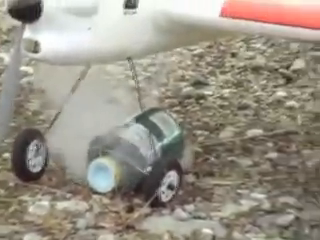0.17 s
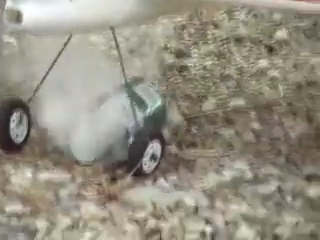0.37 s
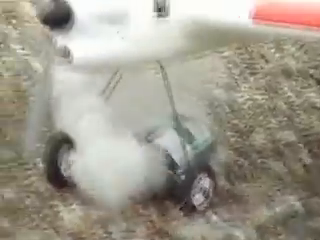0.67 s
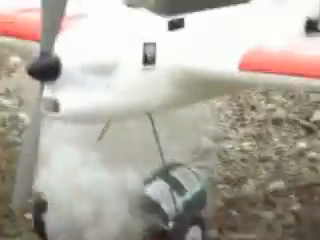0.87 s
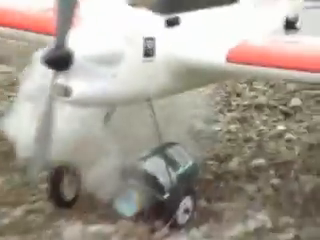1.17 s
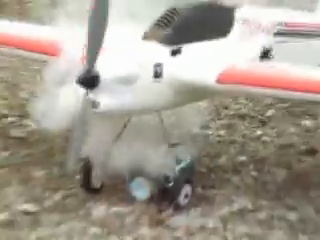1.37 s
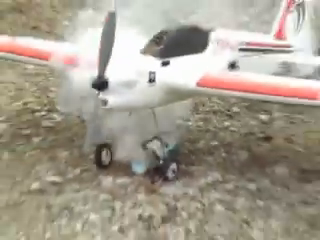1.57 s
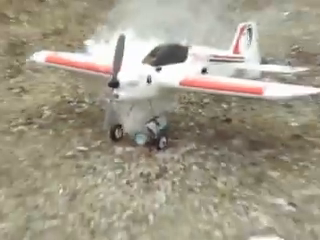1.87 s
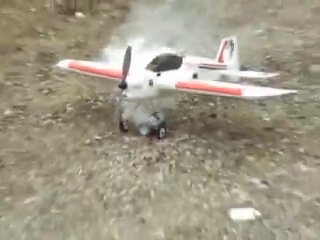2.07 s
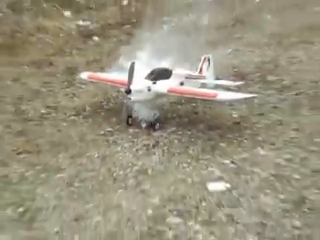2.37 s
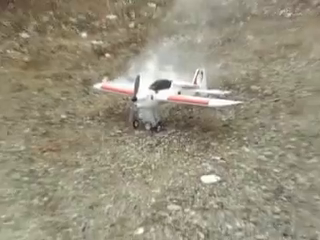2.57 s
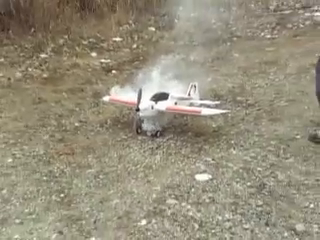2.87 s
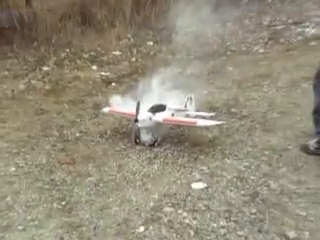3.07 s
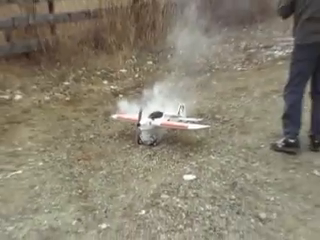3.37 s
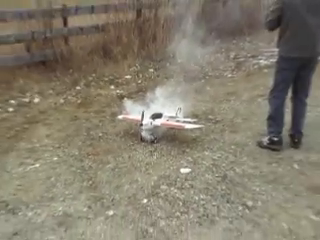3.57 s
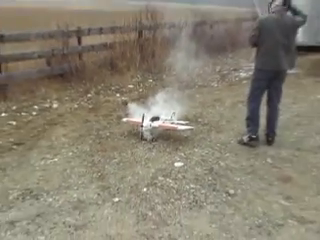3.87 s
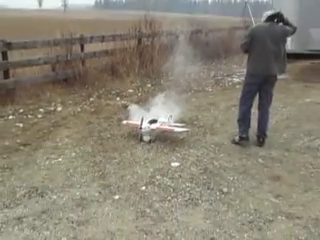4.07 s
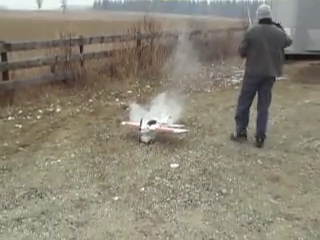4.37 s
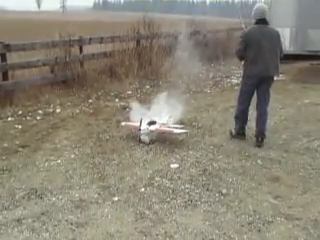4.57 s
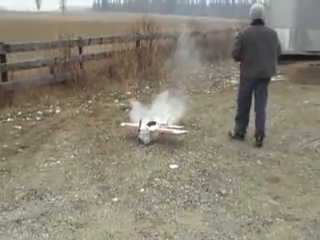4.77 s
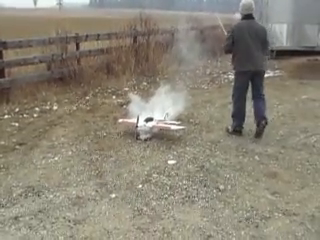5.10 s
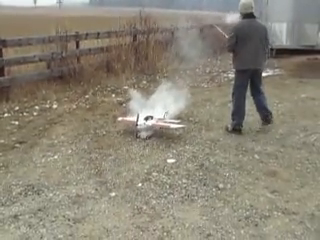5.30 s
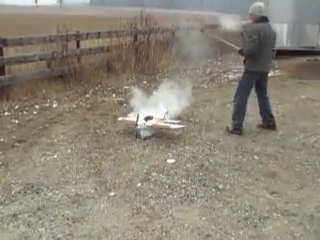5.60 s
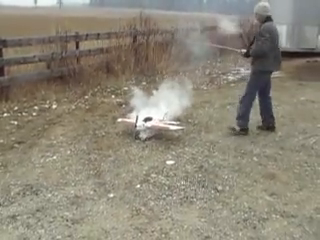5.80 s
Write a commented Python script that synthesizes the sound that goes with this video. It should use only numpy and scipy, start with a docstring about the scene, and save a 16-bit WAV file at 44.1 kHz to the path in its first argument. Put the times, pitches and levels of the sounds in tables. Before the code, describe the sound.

A smoke candle hisses steadily outdoors after a quick flare, with gravel footsteps, small stone knocks and a few sharp close clicks.

```python
"""A farmyard, where a smoke candle burns under a model plane, heard while backing away over gravel.
The jet is shaped noise in three voices: it opens, flares and settles to a hiss over a hollow rush,
with brief surges of resonant noise. Steps are swells of fine grains; stones are short ringing knocks.
A few sharp clicks and a rub ring a small hard body close by, and a motor hums faintly in sine tones.
"""
import sys
import numpy as np
from scipy import signal
from scipy.fft import rfft, irfft, next_fast_len
from scipy.io import wavfile
from scipy.ndimage import map_coordinates

SR = 44100
rng = np.random.default_rng(int(sys.argv[2]) if len(sys.argv) > 2 else 0)


def materialize(psi):
    """Save the field psi as 16-bit PCM at rate SR to the path in sys.argv[1].

    A 1-D psi becomes a single channel; in a 2-D psi each row is a channel.
    """
    bounded = np.clip(np.atleast_2d(psi).T, -1, 1)
    quanta = np.round(bounded * 32767).astype(np.int16)
    wavfile.write(sys.argv[1], SR, quanta)


N = 261973

# Stereo image of the noise at two ports: pitch_hz, likeness (0 to 1), left_minus_right_db, left_lead_rad
PORT_IMAGE = [(60, 0.97, 1, 0.058), (130, 1, -0.5, 0), (299, 0.98, -0.5, 0.051), (736, 1, 0, 0.1),
              (3040, 1, 0, 0), (5200, 1, 0, 0), (6195, 1, -0.5, 0), (7380, 0.878, -1.5, 0.404),
              (8460, 0.55, -2, 1.03), (9575, 0.61, 8, 1.26), (10400, 0.52, 5.5, 0.52), (11500, 0.51, 5, 0)]
# Colour of the rush before its hollow ring is added: pitch_hz, relative_level_db
RUSH_COLOUR = [(30, -43), (65, -16.5), (95, -28.5), (150, -3), (210, -7.5), (290, -1), (450, -1),
               (600, -1.5), (1000, -1.5), (1500, 0), (2200, -3.5), (2550, -4), (3100, 0), (3800, -2.5),
               (5000, -7.5), (8000, -34)]
# Colour of the hiss before the glide moves its pitch: pitch_hz, relative_level_db
HISS_COLOUR = [(2500, -63), (3700, -16.5), (4200, -1.5), (4600, 2), (5350, 3.5), (5900, -0.5), (6700, 0.5),
               (7300, 5.5), (7750, 3.5), (8100, -2.5), (8700, -2), (9300, -12), (12000, -53)]
# Colour of the sizzle before the glide moves its pitch: pitch_hz, relative_level_db
SIZZLE_COLOUR = [(6000, -41), (8000, -22), (9000, -1.5), (9450, 6), (9950, 5.5), (10400, -2.5),
                 (11100, 1.5), (11800, -6), (12500, -39)]
# Hollow resonances of the rush, before the overall ring level: pitch_hz, width_hz, gain_db
HOLLOW_MODES = [(748.8, 101, 12), (1170, 170, -6), (1978, 270, -4.5)]
# Hiss level while backing away, on top of its steady level: time_s, change_db
HISS_LEVEL_CURVE = [(.45, 1), (.75, 1), (1.0, 0.5), (1.2, -1.5), (1.55, -1), (1.88, -1.2), (2.15, 0.5),
                    (2.8, .2), (3.15, 1), (3.4, 1.5), (3.85, 1.6), (4.3, 2), (4.8, 1.06), (5.94, 1.5)]
# Tones of the motor once risen, before their waver: pitch_hz, level_db
MOTOR_TONES = [(119, -86), (180.5, -82.5), (238.5, -78), (3590, -74.5), (3836, -70)]
# Stones on the ground: start_s, tick_db, tick_brightness_hz, own_ring_hz, thud_db, t60_s
STONE_KNOCKS = [(0.139, -64, 2000, 1380, -75, 0.022), (.321, -53, 9000, 6700, -72, .03),
                (.609, -62, 2520, 1500, -55, 0.042), (.839, -57, 2500, 2250, -73, 0.014),
                (.898, -61, 4000, 3700, -59, .02), (.9605, -69, 2400, 2300, -62, .02),
                (1.0145, -73, 2200, 1500, -53.5, 0.025), (1.021, -54.5, 6000, 4400, -70, 0.032),
                (1.040, -60.5, 2300, 2150, -76, .018), (1.121, -63, 3000, 2770, -80, .015),
                (1.175, -78, 1500, 540, -66, 0.042), (1.418, -48.5, 5200, 2100, -50, 0.035),
                (1.423, -48.5, 3400, 1400, -60, 0.046), (1.4342, -53, 2200, 1300, -65, 0.032),
                (1.448, -62, 2000, 1250, -58, .025), (1.4915, -61, 2000, 1570, -73, 0.021),
                (1.6595, -50, 4400, 4400, -49.5, 0.02), (1.6625, -48, 1300, 1240, -50.5, 0.033),
                (1.669, -64, 1900, 1600, -52.5, 0.099), (1.9588, -56.5, 2500, 2220, -66, 0.022),
                (2.041, -58, 2500, 2500, -57, 0.042), (2.058, -59, 2200, 1900, -62, .03),
                (2.072, -59, 2000, 1200, -52.5, 0.038), (2.201, -58, 4000, 3600, -58.5, 0.039),
                (2.4845, -65, 2970, 2800, -74.5, 0.014), (2.657, -56.5, 3400, 1210, -78, 0.022),
                (3.267, -55.5, 5500, 4200, -69, 0.012), (3.444, -54, 3580, 3050, -74, 0.035),
                (3.462, -51, 6000, 4430, -68, 0.029), (3.486, -54.5, 3800, 3500, -71, 0.02),
                (3.5112, -54.5, 4600, 3470, -69, 0.019), (3.68, -57.5, 3000, 3070, -68, 0.035),
                (3.7415, -57.5, 3000, 2910, -75, 0.035), (4.275, -58.5, 2210, 1760, -71, 0.015),
                (4.405, -58, 2600, 2300, -69, .025), (4.463, -58, 3600, 1615, -61, 0.019),
                (4.5404, -59.5, 4200, 2200, -75, 0.0117), (4.649, -73, 1500, 700, -57, 0.022),
                (4.659, -57, 2800, 1890, -65, 0.034), (4.788, -70, 1500, 700, -55, 0.024),
                (4.827, -71, 1500, 650, -59.5, 0.053), (4.852, -73, 1900, 1550, -55.5, 0.02),
                (4.903, -66, 1500, 780, -58.5, 0.033), (5.0172, -59, 3500, 1600, -71, 0.0095),
                (5.254, -51.5, 1950, 1490, -72, 0.0048), (5.6125, -51, 1800, 1530, -62, 0.056),
                (5.6455, -51, 1790, 1480, -62, 0.034)]
# Resonances of the stones: pitch_hz, width_hz, gain_db
STONE_RINGS = [(678, 220, 14), (1256, 150, 6.5), (1523, 96, 4), (2125, 150, 3.5), (2910, 400, -1.5),
               (4350, 1100, -12)]
# Surges of the jet: centre_s, length_s, pitch_hz, width_hz (of each of two resonances), peak_level_db
JET_SURGES = [(.37, 0.19, 770, 260, -51.5), (0.67, 0.15, 800, 260, -53.5), (0.608, 0.27, 5760, 1400, -49),
              (1.417, 0.104, 7000, 1800, -51), (1.72, 0.46, 5710, 700, -53.5),
              (2.646, .16, 7350, 800, -53.5), (2.88, 0.205, 9900, 3500, -53.5),
              (3.195, 0.97, 1950, 327, -64), (3.635, 0.0213, 896, 200, -50),
              (3.675, 0.34, 7430, 1100, -51.5), (3.961, 0.11, 5700, 1500, -49.5),
              (4.128, 0.28, 5930, 400, -53), (4.498, 0.098, 7200, 700, -54)]
# Sharp clicks: start_s, level_db, low_body_db, middle_body_db, high_ring_pitch_ratio, chatter_share_db,
# chatter_t60_s, brightness_hz, catch_share_db, catch_lead_s, left_minus_right_db
SHARP_CLICKS = [(0.3875, -29.5, -12, -17, 1.01, -3, 0.051, 14000, -32, 0.00076, -1),
                (5.2861, -51, 4, 0, 0.92, -2, .02, 7000, -15, 0.002, -1),
                (5.3177, -39, -2, -10, 0.88, 1, 0.016, 9000, -12, 0.0007, -0.5),
                (5.3349, -41, 7.5, -4.5, 0.93, 2, 0.011, 7400, -9, 0.0019, -1),
                (5.344, -49.5, 6, -9.5, 1.3, -2, 0.018, 8000, -11, .001, 3),
                (5.4057, -27, -0.5, -2.5, 1.02, -2, 0.016, 7000, -17.5, 0.0025, -2.5)]
# Resonances of the hard body before each touch reshapes them: pitch_hz, width_hz, gain_db
BODY_MODES = [(687, 160, -4), (850, 180, 6), (1250, 280, 5), (1810, 150, 4), (2250, 460, 4),
              (2930, 270, 2.5), (3590, 320, 8), (4020, 270, 10), (4800, 340, 6.5), (5130, 180, 9),
              (5650, 630, 11), (6460, 230, 5.5), (6660, 310, 4), (9050, 480, -0.5), (10500, 2200, -9)]
# Steps on the gravel: centre_s, length_s, scuff_db, scuff_pitch_hz, ring_at_that_pitch_db, sole_db, pebble_db
FOOTSTEPS = [(0.926, 0.422, -54.5, 1470, 0, -69, -83), (1.623, 0.55, -55, 1240, -7, -62.5, -64),
             (2.023, 0.32, -53.5, 1080, 5, -63, -60.5), (3.328, 0.713, -55.5, 1162, 1, -64.5, -66),
             (3.695, 0.114, -54, 2600, -6, -72, -76), (3.999, 0.27, -52.5, 1610, -16, -64, -66),
             (4.848, 0.292, -58, 710, 11, -66, -66), (5.624, 0.53, -51, 1570, 12, -61.5, -76)]
# Colour of the scuffed gravel before each step's ring: pitch_hz, relative_level_db
GRAVEL_COLOUR = [(150, -31.5), (400, -2), (650, 3.5), (1250, 2), (1700, 2.5), (2200, 2.5), (2700, -4),
                 (4500, -0.5), (7000, -18), (12000, -45.5)]

TIME = np.arange(N) / SR
HIT_TIME = TIME[:SR // 20]  # a short contact is worked out over 50 ms
SIDES = np.array([[1], [-1]])  # left, right

# The jet is fully open at OPEN_S, flares until FLARE_END_S, then settles
OPEN_S, FLARE_END_S, SETTLE_S = 0.3542, 0.67, 0.12
# Hollow ring of the open jet, its change before opening, and its time to build up
RING_DB, WEAK_RING_DB, RING_ONSET_S = 3.5, -16, 0.033
# Hiss and sizzle start at this pitch ratio and sag from BACK_OFF_S on
NEAR_PITCH_RATIO, BACK_OFF_S, PITCH_SAG_PER_S = 1.028, 1.7, 0.018
MOTOR_RISE_S, MOTOR_START_DB = 1.7, -14  # the hum creeps in from this much lower
THUD_LAG_S, THUD_BRIGHT_HZ = 0.002387, 1230
# Bare grit of a stone, then the level and sharpness of its own ring
STONE_DIRECT_DB, OWN_RING_DB, OWN_RING_Q = -7.5, 8, 7.7
CATCH_T60_S, CATCH_BRIGHT_HZ = 0.028, 6500
PEBBLES_PER_S, PEBBLE_T60_S = 15, 0.023
PEBBLE_BRIGHT_RATIO = 1.15  # pebble brightness over scuff pitch, before the mixed sizes
RUB_CENTRE_S, RUB_LENGTH_S, RUB_DB = 5.3, 0.056, -42
CUTOFF_HZ = 12250


def from_db(db):
    """Decibels to gain."""
    return 10 ** (np.asarray(db) / 20)


def pan(left_minus_right_db):
    """Left and right gains that share a level difference evenly."""
    return from_db(left_minus_right_db / 2 * SIDES)


def rms_one(x):
    """Scale to rms 1."""
    return x / np.sqrt(np.mean(x ** 2) + 1e-20)


def in_time(rows):
    """Each column of a curve at every sample."""
    s, *columns = np.transpose(rows)
    return [np.interp(TIME, s, column) for column in columns]


def bins():
    """Frequencies of the FFT bins."""
    return np.fft.rfftfreq(next_fast_len(N, True), 1 / SR)


def in_pitch(rows):
    """Each column of a spectrum at every FFT bin, joined on a log pitch scale."""
    hz, *columns = np.transpose(rows)
    return [np.interp(np.log(bins() + 1), np.log(hz), column) for column in columns]


def spectrum_of(x):
    """FFT on those bins."""
    return rfft(x, next_fast_len(N, True))


def drift(rate):
    """Random wandering of rms 1, with `rate` knots per second joined by straight lines."""
    knots = rng.standard_normal(int(TIME[-1] * rate) + 2)
    return rms_one(np.interp(TIME * rate, np.arange(len(knots)), knots))


def resonate(x, hz, width_hz):
    """A two-pole resonance with a peak gain of about 1."""
    r = np.exp(-np.pi * width_hz / SR)
    feed = np.array([1, 0, -1]) * (1 - r * r) / 2
    return signal.lfilter(feed, [1, -2 * r * np.cos(2 * np.pi * hz / SR), r * r], x)


def cut(x, hz, kind, order):
    """A Butterworth high- or low-pass."""
    sections = signal.butter(order, min(hz, SR / 2 - 1), kind, fs=SR, output="sos")
    return signal.sosfilt(sections, x)


def add(track, s, sound):
    """Mix a short stereo sound in at time s."""
    start = round(s * SR)
    track[:, start:start + sound.shape[1]] += sound[:, :N - start]


def ramp(start_s, length_s):
    """Rises evenly from 0 to 1."""
    return np.clip((TIME - start_s) / length_s, 0, 1)


def swell(centre_s, length_s):
    """A half-sine rise and fall around its centre."""
    return np.cos(np.pi * np.clip((TIME - centre_s) / length_s, -.5, .5))


def turbulence(colour_db):
    """Coloured noise at two ports, alike in the bass and parting in the treble; rms 1."""
    alike, pan_db, lead_rad = in_pitch(PORT_IMAGE)
    alike = np.clip(alike, -1, 1)
    mid, side = spectrum_of(rng.standard_normal((2, N)))
    pair = np.sqrt(1 + alike) * mid + np.sqrt(1 - alike) * side * SIDES
    pair = pair * from_db(colour_db) * pan(pan_db) * np.exp(.5j * SIDES * lead_rad)
    return rms_one(irfft(pair)[:, :N])


def grains(per_s, spread_db):
    """Dense tiny impacts of uneven size, scattered at random."""
    sizes = from_db(spread_db * np.minimum(rng.exponential(1, N), 4))
    signed = sizes * rng.choice([-1, 1], N)
    return signed * (rng.random(N) < per_s / SR)


def contact(chatter_db, t60, apart_db):
    """One hard touch, then a dying, uneven chatter that reaches the two ports a little differently."""
    shared, apart = rng.standard_normal((2, len(HIT_TIME)))
    fade = from_db(-60 * HIT_TIME / t60)
    chatter = shared * np.abs(shared) ** 0.43 * fade  # the power makes the chatter uneven
    force = from_db(chatter_db) * chatter / np.linalg.norm(chatter)
    force[0] = 1  # the hard touch
    return rms_one(force) + from_db(apart_db) * rms_one(apart * fade) * SIDES


def opened(length_s):
    """Rises evenly to 1, reached as the jet is fully open."""
    return ramp(OPEN_S - length_s, length_s)


def burn(steady_db, weak_db, flare_db, opening_s):
    """Gain of one voice of the jet: weak, flaring as it opens, then steady."""
    flare = np.exp(-np.maximum(TIME - FLARE_END_S, 0) / SETTLE_S)
    return from_db(steady_db + weak_db + opened(opening_s) * (flare_db * flare - weak_db))


def hollow(x):
    """The part of a sound that rings in the hollow resonances."""
    return sum(from_db(db) * resonate(x, hz, width) for hz, width, db in HOLLOW_MODES)


def glide(pair):
    """Read steady noise at an even speed, then ever more slowly, so that its pitch sinks."""
    speed = NEAR_PITCH_RATIO - PITCH_SAG_PER_S * np.maximum(TIME - BACK_OFF_S, 0)
    place = np.cumsum(speed) % (N - 1)
    return np.array([map_coordinates(side, [place], order=3) for side in pair])


def candle():
    """Gas leaves the nozzle as a hollow rush, a hiss and a fine sizzle; uneven burning shakes all three."""
    flow = turbulence(in_pitch(RUSH_COLOUR)[0])
    ring_db = RING_DB + WEAK_RING_DB * (1 - opened(RING_ONSET_S))
    ringing = from_db(ring_db + 1.37 * drift(60))
    rush = rms_one(flow + ringing * hollow(flow)) * from_db(0.5 * drift(35))
    rush = rush * burn(steady_db=-54, weak_db=-7, flare_db=5, opening_s=0.53)

    hiss = glide(turbulence(in_pitch(HISS_COLOUR)[0]))
    hiss = hiss * from_db(in_time(HISS_LEVEL_CURVE)[0] + 0.33 * drift(9.0))
    hiss = hiss * burn(steady_db=-48, weak_db=-10.5, flare_db=2.5, opening_s=0.13)

    sizzle = glide(turbulence(in_pitch(SIZZLE_COLOUR)[0])) * from_db(1.13 * drift(5.1))
    sizzle = sizzle * burn(steady_db=-54.5, weak_db=-8, flare_db=7, opening_s=0.14)

    sputter = from_db(0.64 * drift(40))
    return (rush + hiss + sizzle) * sputter


def motor(wobble_rad=0.25, waver_db=2.5):
    """A faint hum and a thin whine from sine tones, each slightly unsteady in phase and level."""
    tones = np.zeros(N)
    for hz, db in MOTOR_TONES:
        level = np.sqrt(2) * from_db(db + waver_db * drift(4))  # root 2 turns rms into peak
        tones += level * np.sin(2 * np.pi * hz * TIME + wobble_rad * drift(8.5))
    return tones * from_db(MOTOR_START_DB * (1 - ramp(0, MOTOR_RISE_S)))


def knock(bright_hz, t60, own_hz=None, grit_db=6):
    """A short gritty knock that rings the stones; the brighter it is, the less bass. Rms 1."""
    grit = cut(contact(grit_db, t60, apart_db=-18), bright_hz, "low", order=2)
    grit = cut(grit, 0.38 * bright_hz, "high", order=2)
    grit = cut(grit, 520, "high", order=5)
    sound = from_db(STONE_DIRECT_DB) * grit
    for hz, width, db in STONE_RINGS:
        sound = sound + from_db(db) * resonate(grit, hz, width)
    if own_hz:
        sound = sound + from_db(OWN_RING_DB) * resonate(grit, own_hz, own_hz / OWN_RING_Q)
    return rms_one(sound)


def stones():
    """A larger stone tips under a sole: a short ringing tick, then a dull thud as it beds down."""
    out = np.zeros((2, N))
    for s, tick_db, bright_hz, own_hz, thud_db, t60 in STONE_KNOCKS:
        add(out, s, from_db(tick_db) * knock(bright_hz, t60, own_hz))
        add(out, s + THUD_LAG_S, from_db(thud_db) * knock(THUD_BRIGHT_HZ, t60, grit_db=4))
    return out


def surges():
    """Now and then the jet swells and sings breathily: noise through two equal resonances."""
    white = turbulence(np.zeros(len(bins())))
    out = np.zeros((2, N))
    for s, length, hz, width, db in JET_SURGES:
        breath = rms_one(resonate(resonate(white, hz, width), hz, width))
        out += from_db(db) * swell(s, length) * breath
    return out


def hard_body(force, low_db, middle_db, ratio):
    """A small hard body rings; the touch sets its low and middle modes and shifts the high ones. Rms 1."""
    rings = 0
    for k, (hz, width, db) in enumerate(BODY_MODES):
        if hz < 1600:
            touch_db, shift = low_db, 1
        elif hz < 4200:
            touch_db, shift = middle_db, 1
        else:
            touch_db, shift = 0, ratio
        polarity = (-1) ** k  # neighbouring modes push in opposite directions
        rings = rings + polarity * from_db(db + touch_db) * resonate(force, hz * shift, width)
    return rms_one(cut(rings, 620, "high", order=6))


def clicks(apart_db=-13):
    """Each click catches with a tiny scrape, then snaps on the hard body; a low-pass softens its top."""
    out = np.zeros((2, N))
    for (s, level_db, low_db, middle_db, ratio, chatter_db, t60,
         bright_hz, catch_db, lead_s, pan_db) in SHARP_CLICKS:
        catch = cut(contact(15, CATCH_T60_S, apart_db), CATCH_BRIGHT_HZ, "low", order=4)
        snap = cut(contact(chatter_db, t60, apart_db), bright_hz, "low", order=4)
        gain = from_db(level_db) * pan(pan_db)
        add(out, s - lead_s, gain * from_db(catch_db) * hard_body(catch, low_db, middle_db, ratio))
        add(out, s, gain * hard_body(snap, low_db, middle_db, ratio))
    return out


def crunch():
    """The dull sound of ground giving under a sole: grains through one broad low resonance. Rms 1."""
    sole = resonate(grains(per_s=2500, spread_db=4), 360, 380)
    sole = cut(sole, 140, "high", order=4)
    return rms_one(cut(sole, 720, "low", order=2))


def steps():
    """Each step presses out a dull crunch and drags a swell of grains, pitched by the stones it meets."""
    gravel = spectrum_of(grains(per_s=2500, spread_db=4)) * from_db(in_pitch(GRAVEL_COLOUR)[0])
    gravel = rms_one(irfft(gravel)[:N])
    sole = crunch() + from_db(-11) * crunch() * SIDES  # the second crunch widens the first
    out = np.zeros((2, N))
    for s, length, scuff_db, scuff_hz, ring_db, sole_db, _ in FOOTSTEPS:
        scuff = rms_one(gravel + from_db(ring_db) * resonate(gravel, scuff_hz, 170))
        out += swell(s, length) * (from_db(scuff_db) * scuff + from_db(sole_db) * sole)
    return out


def pebbles(size_octaves=0.092):
    """Each step loosens small stones of mixed size at uneven moments while the foot is down."""
    out = np.zeros((2, N))
    for s, length, _, scuff_hz, _, _, pebble_db in FOOTSTEPS:
        for k, (wait, size) in enumerate(rng.uniform(-0.88, 1, size=(12, 2))):
            delay = (k + (1 + wait) / 2) / PEBBLES_PER_S
            if delay < length:
                bright_hz = PEBBLE_BRIGHT_RATIO * scuff_hz * 2 ** (size_octaves * size)
                tick = knock(bright_hz, PEBBLE_T60_S)
                add(out, s - length / 2 + delay, from_db(pebble_db) * tick)
    return out


def rub(rasp_hz=1250, rasp_width_hz=450, rasp_db=-3):
    """A short gritty rub on the hard body among the last clicks, with a lower rasp, set to the right."""
    force = cut(grains(per_s=1800, spread_db=4), 5200, "low", order=4)
    body = hard_body(force, low_db=-5, middle_db=-11, ratio=.9)
    rasp = resonate(resonate(force, rasp_hz, rasp_width_hz), rasp_hz, rasp_width_hz)
    sound = body + from_db(rasp_db) * rms_one(rasp)
    return from_db(RUB_DB) * swell(RUB_CENTRE_S, RUB_LENGTH_S) * sound * pan(-4.0)


def scene():
    """Open air with no echo: the jet and its surges, the gravel, the motor, the clicks and the rub."""
    jet = candle() + surges()
    ground = stones() + steps() + pebbles()
    close_by = motor() + clicks() + rub()
    return jet + ground + close_by


def record(dry):
    """The top is cut steeply by an elliptic low-pass."""
    return signal.sosfilt(signal.ellip(10, .2, 75, CUTOFF_HZ, fs=SR, output="sos"), dry)


dry = scene()
out = record(dry)
materialize(out)
```